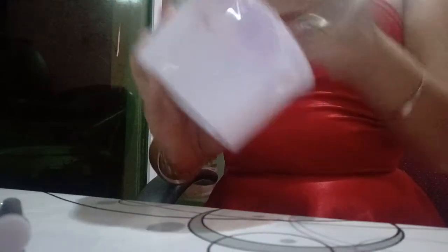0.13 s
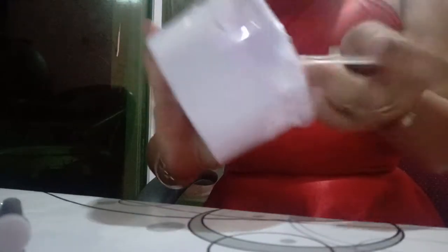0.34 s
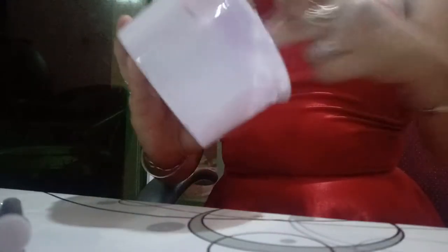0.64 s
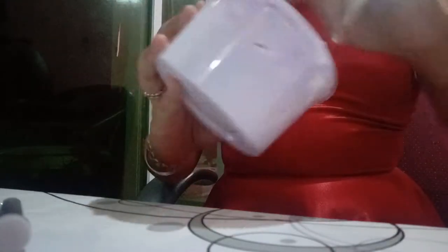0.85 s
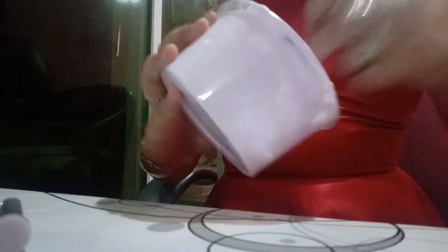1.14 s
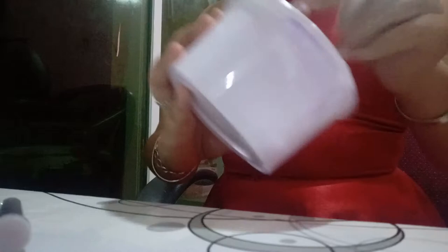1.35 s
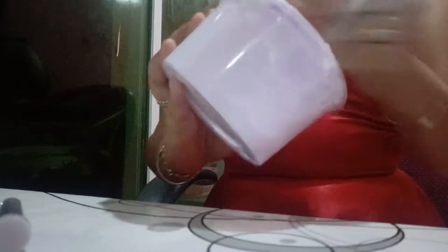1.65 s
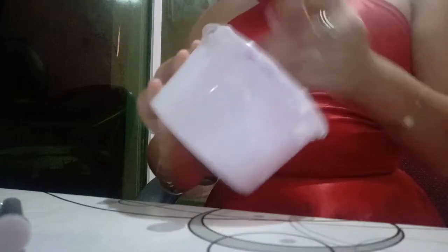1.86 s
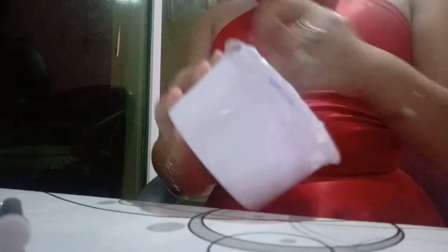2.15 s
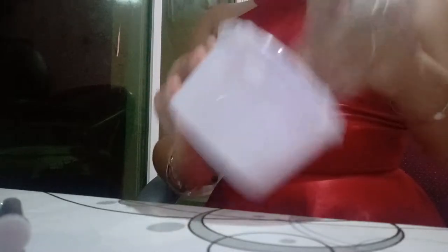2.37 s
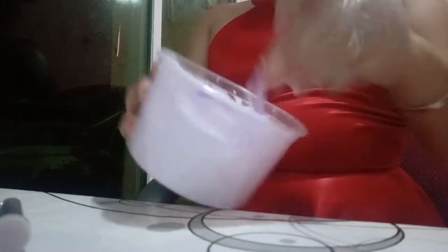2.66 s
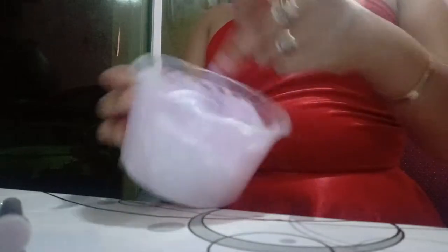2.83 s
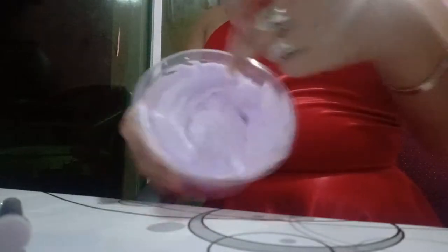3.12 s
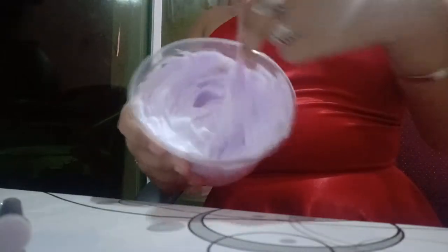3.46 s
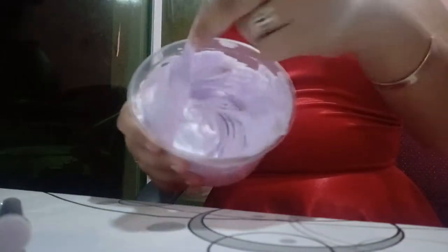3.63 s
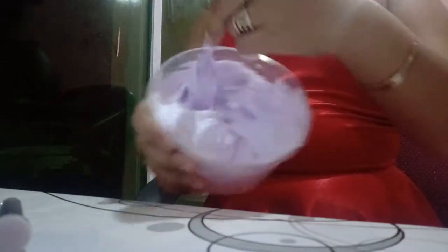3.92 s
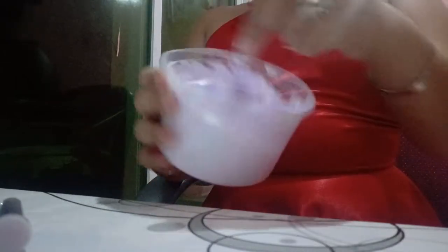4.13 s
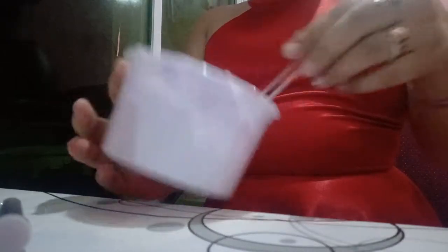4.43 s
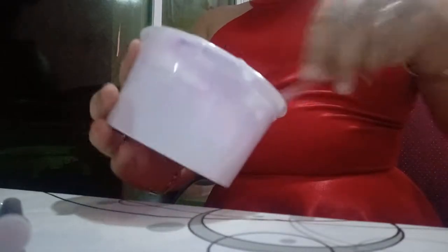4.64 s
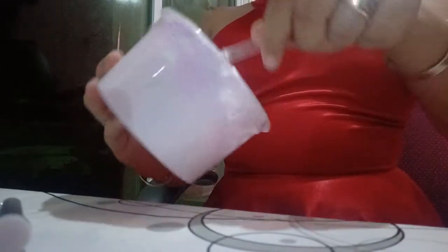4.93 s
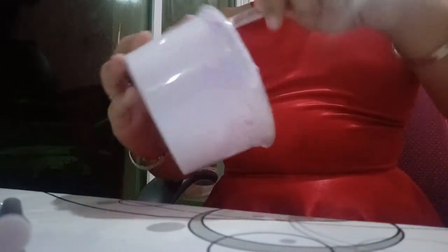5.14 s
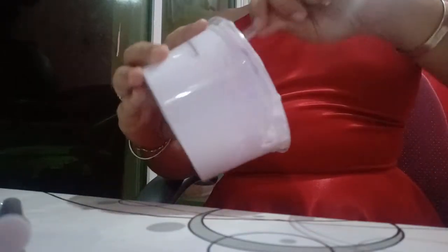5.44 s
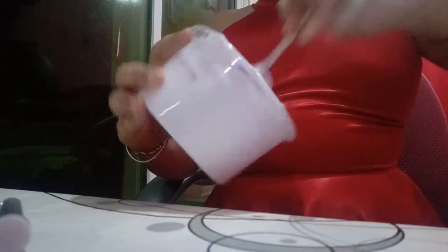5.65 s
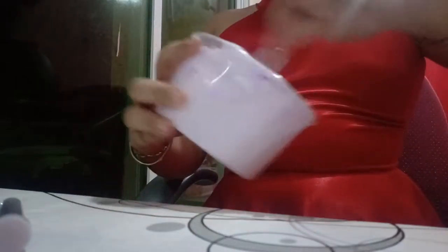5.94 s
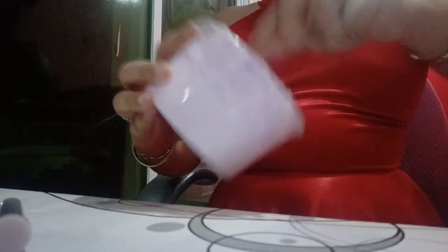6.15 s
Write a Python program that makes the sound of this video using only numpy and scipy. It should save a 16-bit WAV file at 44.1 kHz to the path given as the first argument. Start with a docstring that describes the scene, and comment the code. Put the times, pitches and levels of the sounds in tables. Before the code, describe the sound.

Close, dry indoor sound, slightly stronger on the right: air pockets burst with short hollow plops in sticky slime, wrapped in tiny wet clicks. Strokes quicken and grow louder, two thudding in the cup's base. A short sinking rub follows, then more pops and a hard plastic knock. Afterwards it quiets to one squelch and a few soft crackles above a low hum.

```python
"""Sticky slime is stirred with a stick in a hand-held plastic cup, close to a phone in a small room. Noise
through resonances gives room air under a faint motor hum of sines; tiny clicks crackle with each stroke. Air
pockets pop from the start as decaying sines with a noisy tear; near 2.5 s the cup's base twice knocks on the
table and booms. Near 2.9 s the cup turns in the palm with a sinking groan of filtered clicks; at 3.9 s the
stick clacks on it. After that the pops grow sparse, and a few soft ones come near 6 s."""
import sys
import numpy as np
from scipy import signal
from scipy.fft import rfft, irfft, next_fast_len
from scipy.io import wavfile

SR = 44100
rng = np.random.default_rng(int(sys.argv[2]) if len(sys.argv) > 2 else 0)


def wav_record(signal):
    """Record a signal, one row per channel, as 16-bit PCM in the file named by sys.argv[1]."""
    frames = np.transpose(np.atleast_2d(signal))
    bounded = np.clip(frames, -1, 1)
    # unit amplitude maps onto the largest positive 16-bit level
    quanta = np.round(bounded * 32767).astype(np.int16)
    wavfile.write(sys.argv[1], SR, quanta)


N = 277168  # length in samples

# Resonances of the plastic cup wall. Each row: centre in Hz, width in Hz, gain in dB before scaling.
WALL_MODES = [(1330, 150, -1), (2244, 710, 0.5), (2735, 1200, -5)]
# Resonances of the tearing slime film. Each row: centre in Hz, width in Hz, gain in dB before scaling.
FILM_MODES = [(3730, 2500, 6.5), (5100, 840, 15), (6440, 1100, -8), (13510, 5800, -12)]


def undb(db):
    """Decibels to gain."""
    return 10 ** (np.asarray(db) / 20)


def unit(x):
    """Scale to rms 1."""
    return x / np.sqrt(np.mean(x ** 2))


def burst(x):
    """Scale a hit to rms 1 over its first hundredth of a second."""
    return x / np.sqrt(np.mean(x[..., :SR // 100] ** 2))


def fade(t, t60):
    """Exponential decay that falls by 60 dB in t60 seconds."""
    return np.exp(-np.log(1000) * t / t60)


def band(x, hz, width):
    """One resonance, gain 1 at its centre."""
    return signal.lfilter(*signal.iirpeak(hz, hz / width, fs=SR), x)


def ring(x, modes):
    """A set of resonances with steep skirts and alternating signs."""
    total = 0
    for k, (hz, width, db) in enumerate(modes):
        steep = band(band(x, hz, width), hz, hz / 2)
        total = total + (-1) ** k * undb(db) * steep
    return total


def struck(t, modes):
    """A struck solid: decaying sines with alternating signs, all set off at once."""
    total = 0
    for k, (hz, t60, db) in enumerate(modes):
        total = total + (-1) ** k * undb(db) * np.sin(2 * np.pi * hz * t) * fade(t, t60)
    return total


def sides(pan_db):
    """Left and right gains that differ by pan_db, left minus right."""
    return undb(np.array([[pan_db], [-pan_db]]) / 2)


def pair(shape, apart):
    """Noise at the two microphone ports, partly shared; more apart means less shared."""
    shared = rng.standard_normal(shape)
    own = rng.standard_normal((2, shape))
    return (shared + apart * own) / np.hypot(1, apart)


def colour(x, points):
    """Filter by a (Hz, dB) spectrum."""
    hz, db = np.transpose(points)
    n = next_fast_len(N + SR // 10)
    f = np.fft.rfftfreq(n, 1 / SR)
    gain = undb(np.interp(np.log(f + 1), np.log(hz), db))
    return irfft(rfft(x, n) * gain, n)[..., :N]


def add(out, s, x):
    """Mix x in at s seconds."""
    i = max(int(s * SR), 0)
    out[:, i:i + x.shape[-1]] += x[..., :max(N - i, 0)]


def walk(rate):
    """A smooth random wander with spread near 1 and about rate turning knots a second."""
    knots = np.cumsum(rng.uniform(.5, 1.5, size=2000)) / rate - 1.5 / rate
    return 1.2 * np.interp(np.arange(N) / SR, knots, rng.standard_normal(size=2000))


def swell(peak_s, rise_s, fall_s):
    """A gain that climbs by 20 dB over the rise time, rounds off at 1 and sinks as far over the fall time."""
    swell_db, roundness = 20, 1.31  # an exponent above 1 rounds the top and ends sooner
    t = np.arange(N) / SR - peak_s
    away = np.maximum(-t / rise_s, t / fall_s)
    return undb(-swell_db * np.abs(away) ** roundness)


def grains(count, spread_db, apart):
    """Tiny clicks at random times, count a second, with gains spread exponentially in dB."""
    out, total = np.zeros((2, N)), count * N // SR
    size = undb(spread_db * np.minimum(rng.exponential(size=total), 4))
    out[:, rng.integers(N, size=total)] = pair(total, apart) * size
    return out


def background(air_db=-59.5, hum_db=-1, hiss_db=-82):
    """Soft room noise, alike at both ports in the bass, a wavering motor hum and faint microphone hiss."""
    # Spectrum of the still room air. Each row: frequency in Hz, relative density in dB.
    air_spectrum = [(15, -27.5), (25, -5.5), (54, -14), (96, -8), (124, -5), (216, -16.5), (351, -13),
                    (464, -22), (687, -17), (867, -27), (1550, -29.5), (2290, -25), (3480, -35),
                    (4930, -37.5), (6360, -43.5), (8270, -65.5), (14000, -120)]
    # Motor hum. Each row: frequency in Hz, mean level in dB before hum_db and the pan.
    hum_tones = [(118.4, -62.5), (172.3, -70.5), (236.9, -74.5), (360.7, -72.5), (656.8, -79)]
    t = np.arange(N) / SR
    side = colour(rng.standard_normal(N), [(100, -23), (500, -2.5), (2000, 1.5), (8000, -4.0)])
    # the side noise enters the two ports with opposite signs
    air = unit(colour(rng.standard_normal(N) + side * np.array([[1], [-1]]), air_spectrum))
    hum = 0
    for hz, db in hum_tones:
        swell_db, drift = 2.5 * walk(rate=16), .65 * walk(rate=11)  # drift in radians
        level = np.sqrt(2) * undb(db + hum_db + swell_db)
        hum = hum + level * np.sin(2 * np.pi * hz * t + drift)
    return undb(air_db) * air * sides(-1.3) + hum * sides(-5.5) + undb(hiss_db) * pair(N, 0.73)


def room(x, early_db=-14, early_t60=0.08, low_db=-16, low_t60=0.39, high_db=-15, high_t60=.3):
    """Table and body reflect within a few milliseconds; the walls add a short diffuse tail."""
    t = np.arange(SR // 2) / SR
    onset = np.clip((t - .003) / 0.0026, 0, 1)
    low = signal.sosfilt(signal.butter(2, 1200, fs=SR, output="sos"), pair(len(t), 0.96))
    high = signal.sosfilt(signal.butter(2, 1200, "high", fs=SR, output="sos"), pair(len(t), 6))
    early = pair(len(t), 0.65)
    echo = 0
    for noise, db, t60 in [(early, early_db, early_t60), (low, low_db, low_t60), (high, high_db, high_t60)]:
        shape = onset * fade(t, t60)
        echo = echo + undb(db) * noise * shape / np.linalg.norm(shape)
    return signal.fftconvolve(x.mean(axis=0)[None], echo, axes=1)[:, :N] * sides(-2)


def stirring():
    """Levels in dB of the squelch and of the fine crackle; overlapping strokes add in power."""
    # Strokes of the stick: each shears the slime harder and lets go. Each row: peak in seconds,
    # rise in seconds, fall in seconds, squelch in dB, fine crackle in dB, both before the trims in crackle().
    strokes = [(0.05, 0.18, 0.17, -55, -57.5), (0.22, 0.11, 0.053, -50.5, -58),
               (0.37, 0.084, 0.59, -53.5, -65), (0.57, 0.29, 0.17, -47, -50.5),
               (0.75, .04, 0.099, -53, -64), (0.99, .12, 0.47, -59, -52), (1.2, 0.36, 0.15, -46.5, -52),
               (1.489, 0.048, 0.13, -43.5, -42), (1.809, 0.18, 0.098, -43.5, -46.5),
               (2.03, 0.12, 0.089, -44, -49), (2.18, 0.15, 0.094, -42.5, -46), (2.32, 0.12, 0.21, -47, -51),
               (2.49, 0.15, 0.22, -53.5, -50.5), (2.792, 0.11, 0.098, -43, -49),
               (2.96, 0.14, 0.17, -58.5, -50.5), (3.135, 0.14, 0.069, -46.5, -53),
               (3.48, .085, 0.11, -49, -48), (3.87, 0.093, 0.11, -44, -48), (4.0, .12, 0.27, -62, -54.5),
               (4.37, .15, .2, -68.5, -66.5), (4.54, 0.054, 0.084, -52, -59), (4.751, .12, .3, -64.5, -72),
               (5.145, 0.057, 0.072, -42.5, -57), (5.19, 0.1, 0.24, -55.5, -57),
               (5.38, 0.34, 0.33, -63, -65.5), (5.9, 0.28, 0.26, -61, -60.5),
               (6.11, 0.16, .16, -46.5, -56.5), (6.26, 0.22, .3, -56.5, -57)]
    power = 0
    for s, rise, fall, squelch, fine in strokes:
        power = power + (undb([[squelch], [fine]]) * swell(s, rise, fall)) ** 2
    return 10 * np.log10(power + 1e-18)


def bubbles(modes, count, spread_db, shift_db):
    """Each resonance has its own bubbles, and is reached more or less well as the stick moves."""
    total = 0
    for mode in modes:
        clicks = ring(grains(count, spread_db, apart=1.0), [mode])
        total = total + clicks * undb(shift_db * walk(rate=18))
    return unit(total)


def crackle(squelch_db=-2, wall_db=-4.5, film_db=-1, wall_share=.5, clump_db=3.0,
            stray_db=-10, stray_wall_db=-3, stray_film_db=-14):
    """Sheared slime opens small bubbles in uneven clumps, coloured by the cup; sparser, larger ones click."""
    # The air in the cup. Each row: centre in Hz, width in Hz, gain in dB before scaling.
    hollow_modes = [(685, 190, -1), (992, 130, -0.5), (1220, 280, -7)]
    low, high = stirring()
    wall_level = low + wall_share * (high - low)
    squelch = bubbles(hollow_modes, count=900, spread_db=4.0, shift_db=2.5) * undb(low + squelch_db)
    wall = bubbles(WALL_MODES, count=1200, spread_db=-0.5, shift_db=-1.0) * undb(wall_level + wall_db)
    film = bubbles(FILM_MODES, count=2600, spread_db=0.5, shift_db=4) * undb(high + film_db)
    clumps = undb(clump_db * walk(rate=71))
    larger = grains(count=35, spread_db=5.5, apart=0.43)
    stray = ring(larger, hollow_modes) + undb(stray_wall_db) * ring(larger, WALL_MODES)
    stray = unit(stray + undb(stray_film_db) * ring(larger, FILM_MODES))
    return (squelch + wall + film) * clumps + stray * undb(low + stray_db)


def sweep(x, hz, width):
    """A resonance whose centre moves, blended from half-octave bands; width is a share of the centre."""
    octave = np.log2(hz)
    total = 0
    for f in 100 * 2 ** (np.arange(7) / 2):
        share = np.clip(1 - 2 * abs(octave - np.log2(f)), 0, 1)
        # the root evens out the power of the wider high bands
        total = total + share * band(band(x, f, width * f), f, width * f) / np.sqrt(f)
    return total


def turning():
    """Fingers stick and slip on the cup turning in the palm; the broad groan sinks as it slows."""
    # Slips of the fingers. Each row: peak in seconds, rise in seconds, fall in seconds, level in dB.
    slip_rows = [(2.909, 0.035, 0.023, -34.5), (2.944, 0.021, 0.019, -26.5), (3.03, .11, .15, -41)]
    # the pitch falls from turn_s on, an octave in each halving time, down to end_hz
    turn_s, start_hz, halving_s, end_hz = 2.877, 586.5, .105, 112.6
    since = np.maximum(np.arange(N) / SR - turn_s, 0)
    hz = np.maximum(start_hz * 2 ** (-since / halving_s), end_hz)
    slips = grains(count=2000, spread_db=1.5, apart=0)[0]
    groan = unit(sweep(slips, hz, width=.95))
    return groan * sum(undb(db) * swell(s, rise, fall) for s, rise, fall, db in slip_rows)


def thumps(rumble_db=-19, rumble_hz=430, rumble_t60=0.46):
    """The base of the cup knocks on the table and booms; its close modes swell over the first cycles and leave
    a dull rumble."""
    # Knocks of the cup's base on the table. Each row: start in seconds, level in dB.
    table_knocks = [(2.4058, -17.5), (2.652, -16.5)]
    # Modes of the base. Each row: frequency in Hz, 60 dB decay in seconds, gain in dB before scaling.
    base_modes = [(149, 0.064, -12), (283, 0.036, 3.5), (348, 0.028, 4), (385, 0.01, -8.5),
                  (590, .035, -15.5)]
    out, t = np.zeros((2, N)), np.arange(SR // 2) / SR
    for s, db in table_knocks:
        boom = burst(struck(t, base_modes))
        dull = band(band(pair(len(t), 0.3), rumble_hz, rumble_hz), rumble_hz, 2 * rumble_hz)
        rumble = unit(dull) * fade(t, rumble_t60)
        add(out, s, undb(db) * (boom + undb(rumble_db) * rumble))
    return out


def clack(contact_db=-7, contact_t60=0.0052, contact_hz=2500):
    """The stick strikes the plastic: a sharp contact and a short hard knock."""
    # Modes that the stick rings. Each row: frequency in Hz, 60 dB decay in seconds, gain in dB before scaling.
    cup_modes = [(1050, 0.015, -9), (1370, 0.012, 1.5), (1746, .006, -0.5), (2136, .011, 0.5),
                 (4540, 0.0078, -10), (4950, 0.014, -9)]
    start_s, level_db = 3.8892, -17.5
    out, t = np.zeros((2, N)), np.arange(SR // 12) / SR
    knock = struck(t, cup_modes)
    contact = pair(len(t), 1.0) * fade(t, contact_t60)
    contact = band(band(contact, contact_hz, 1.1 * contact_hz), contact_hz, 1.5 * contact_hz)
    add(out, start_s, undb(level_db) * (burst(knock) + undb(contact_db) * burst(contact)))
    return out


def snaps(snap_t60=0.023, wall_db=-12):
    """A bare strand parts, no pocket behind it, with a bright tick that hardly reaches the cup wall."""
    # Parting strands. Each row: start in seconds, level in dB.
    strands = [(1.789, -37), (3.475, -33), (3.838, -43), (4.01, -48.5), (4.887, -61), (5.697, -54.5),
               (5.7768, -45.5)]
    out, t = np.zeros((2, N)), np.arange(SR // 12) / SR
    for s, db in strands:
        tear = pair(len(t), 0.66) * fade(t, snap_t60)
        tick = burst(ring(tear, FILM_MODES)) + undb(wall_db) * burst(ring(tear, WALL_MODES))
        add(out, s, undb(db) * tick)
    return out


def pops(pocket_t60=0.02, cling_t60=0.037, cling_db=-26, pocket_db=-1, wall_db=-1, film_db=-1):
    """A film tears: the opened pocket rings for a few cycles, and the tear rattles the cup wall."""
    # Bursting air pockets. Each row: start in seconds, level in dB before the trims, nominal pitch in Hz,
    # cup wall in dB relative to the pocket, film snap in dB relative to the pocket.
    pockets = [(0.001, -22.5, 870, -14, -9.5), (0.0249, -26.5, 970, -20, -11.5), (0.1384, -52, 750, 0, -17),
               (0.1726, -49, 980, -17, -19), (0.198, -37, 953, -36, -30),
               (0.2814, -29.5, 813, -17.5, -13.5), (0.3508, -50.5, 590, 6.5, 4), (0.5645, -48, 844, 0.5, 0),
               (0.7255, -40.5, 817, -18, -10.5), (0.9143, -48, 906, -9, -9),
               (1.1543, -38.5, 930, -21, -9.5), (1.3318, -48, 960, -7, -18),
               (1.4488, -25.5, 946, -4.5, -10), (1.5293, -30.5, 1190, -24, -9.5),
               (1.5724, -42, 875, -13, -1), (1.7364, -20, 783, -7.5, -10.5), (1.778, -40.5, 940, -4, -10),
               (1.8972, -45, 870, -4.5, -5), (1.9698, -41.5, 820, -5, -25), (2.0675, -14.5, 741, -7.5, -16),
               (2.2166, -26, 946, -12.5, -1), (2.2974, -44.5, 1050, -2.5, 1.5),
               (2.3816, -20, 723, -10.5, -10.5), (2.405, -12, 614, -9, -23), (2.469, -36.5, 634, -1, -10.5),
               (2.652, -12.5, 625, -16, -19.5), (2.691, -33, 909, 0, -4.5),
               (2.7989, -35.5, 900, -7.5, -6.5), (3.004, -43, 960, -5, -6.5),
               (3.0616, -30.5, 800, -7.5, -13), (3.1125, -46.5, 1475, 2.5, 5.5),
               (3.432, -24.5, 883, -2, -12), (3.4676, -29, 850, -18, -16), (3.4996, -25.5, 692, -16.5, -20),
               (3.7712, -49.5, 1074, -9.5, -5), (3.796, -23.5, 690, -14.5, -12),
               (3.856, -33.5, 1050, -2, -3.5), (3.8682, -32.5, 660, -1, -4.5), (3.8847, -33.5, 790, -4, -1),
               (4.0752, -53.5, 627, 3, -4), (4.1735, -53, 1157, -11, 1), (4.342, -52.5, 1200, -7, 1.5),
               (4.5033, -44, 1180, -6, -7.5), (5.872, -47, 760, -0.5, -4), (5.9187, -49.5, 775, -4, -7),
               (6.0748, -40, 830, 2.5, -2), (6.2071, -41.5, 954, -14, -9)]
    # Modes of a pocket. Each row: nominal multiple of its pitch, gain in dB before scaling.
    pocket_modes = [(.48, -12.5), (.74, -1.5), (1, 5), (1.44, 0), (1.9, -5.5)]
    # a harder pull tears the film faster: tearing time at ref_db, and the rise in level that halves it
    tear_s, ref_db, halving_db = 0.0023, -25.5, 33
    out, t = np.zeros((2, N)), np.arange(SR // 12) / SR
    for s, db, hz, wall, film in pockets:
        pocket = 0
        for k, (multiple, mode_db) in enumerate(pocket_modes):
            # no two pockets have the same shape
            f = hz * multiple ** (1 + .08 * rng.standard_normal())
            decay = fade(t, pocket_t60 / np.sqrt(multiple))
            pocket = pocket + (-1) ** k * undb(mode_db) * np.sin(2 * np.pi * f * t) * decay
        pocket = band(pocket, hz, 8.2 * hz)
        # the tear gathers speed and runs out; strands keep snapping for a moment after it
        age = 2 * t / (tear_s * 2 ** ((ref_db - db) / halving_db))
        tear = pair(len(t), 0.97) * (age * np.exp(1 - age) + undb(cling_db) * fade(t, cling_t60))
        rattle = undb(wall + wall_db) * burst(ring(tear, WALL_MODES))
        snap = undb(film + film_db) * burst(ring(tear, FILM_MODES))
        add(out, s, undb(db) * (undb(pocket_db) * burst(pocket) + rattle + snap))
    return out


def scene():
    """The cup is nearer the right port, so the left hears it a little later and weaker."""
    # How the two ports hear the cup. Each row: frequency in Hz, left minus right in dB.
    ports = [(120, -3), (300, -1), (600, -2.5), (740, -.5), (950, -8), (1300, -5.5), (2200, -5), (4000, -8),
             (5100, -9), (8000, -4.5), (13000, -1)]
    lag = 5  # samples
    cup = pops() + snaps() + clack() + thumps() + crackle() + turning()
    left = colour(cup[0], [(hz, db / 2) for hz, db in ports])
    right = colour(cup[1], [(hz, -db / 2) for hz, db in ports])
    direct = np.stack([np.pad(left, (lag, 0))[:N], right])
    return direct + room(cup) + background()


def record(dry):
    """The phone thins the deep bass, rounds the highest peaks and cuts the top."""
    top_hz = 15800
    thin = signal.sosfilt(signal.butter(2, 55, "high", fs=SR, output="sos"), dry)
    rounded = np.tanh(thin)
    return signal.sosfilt(signal.ellip(8, .2, 70, top_hz, fs=SR, output="sos"), rounded)


dry = scene()
out = record(dry)
wav_record(out)
```